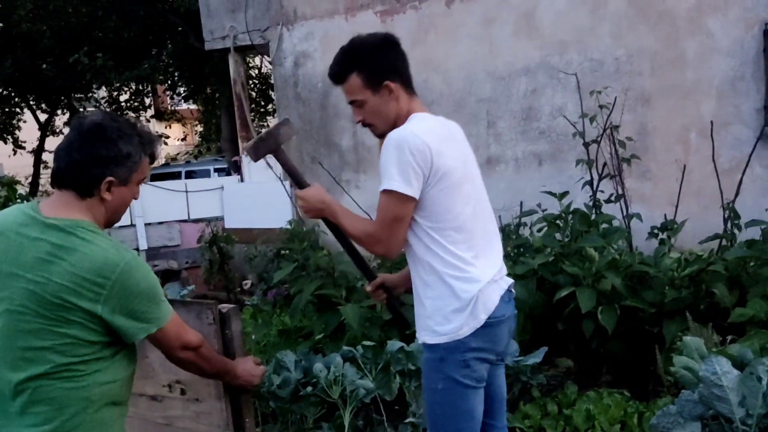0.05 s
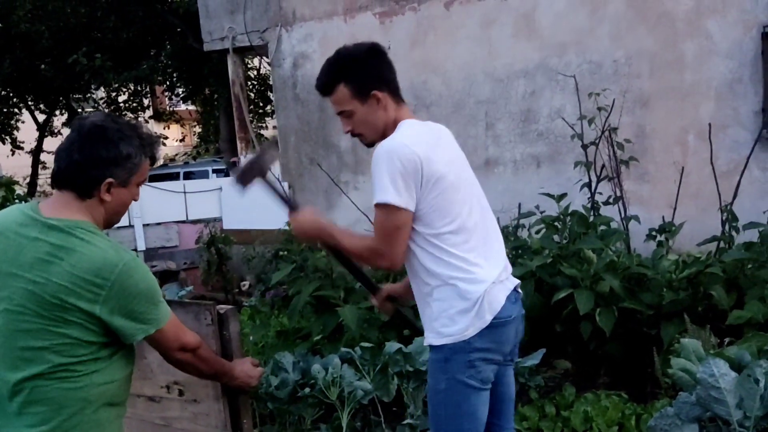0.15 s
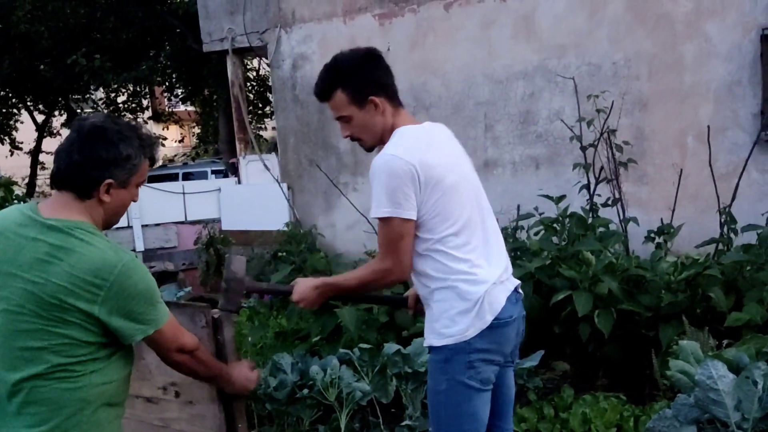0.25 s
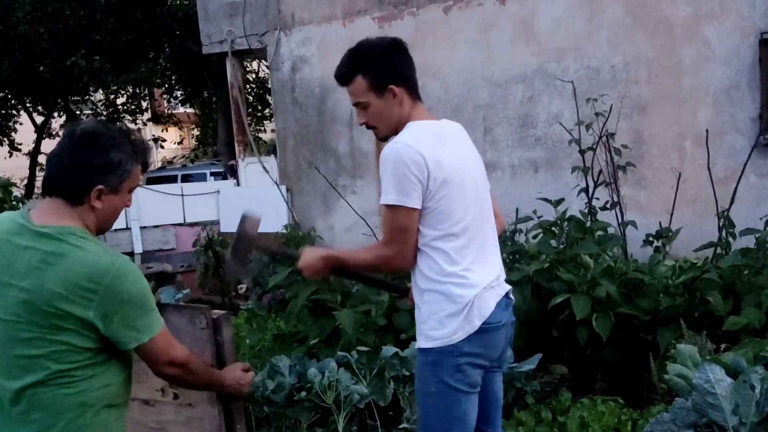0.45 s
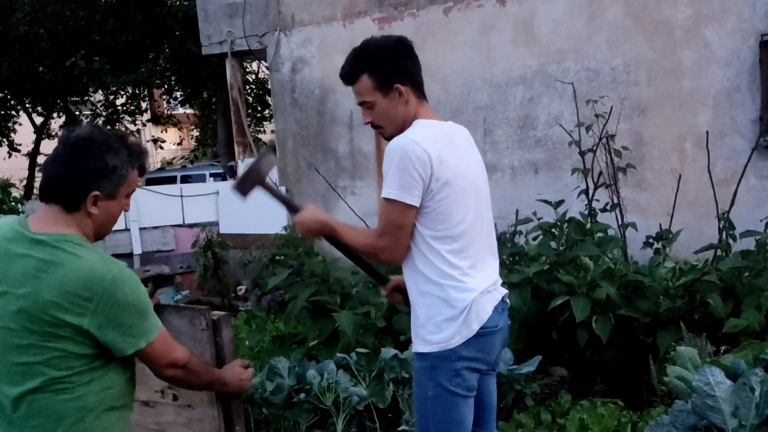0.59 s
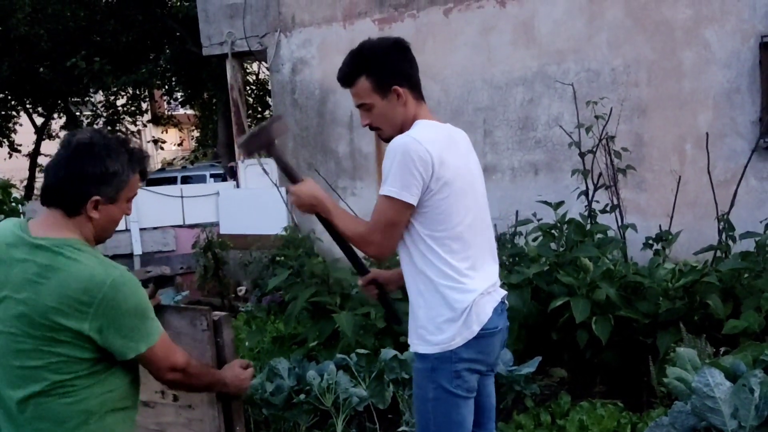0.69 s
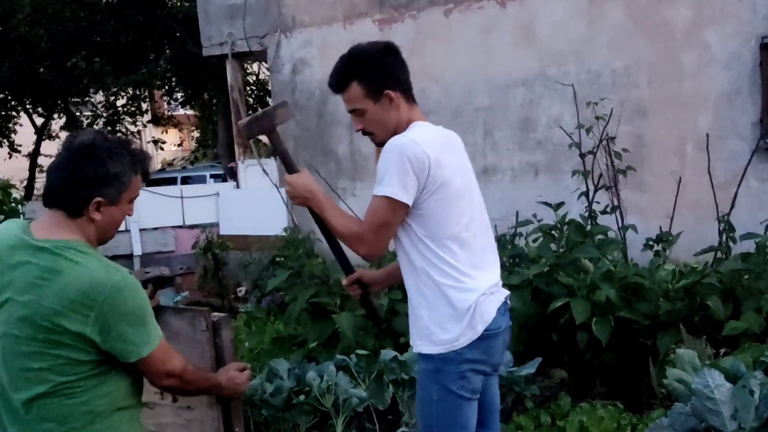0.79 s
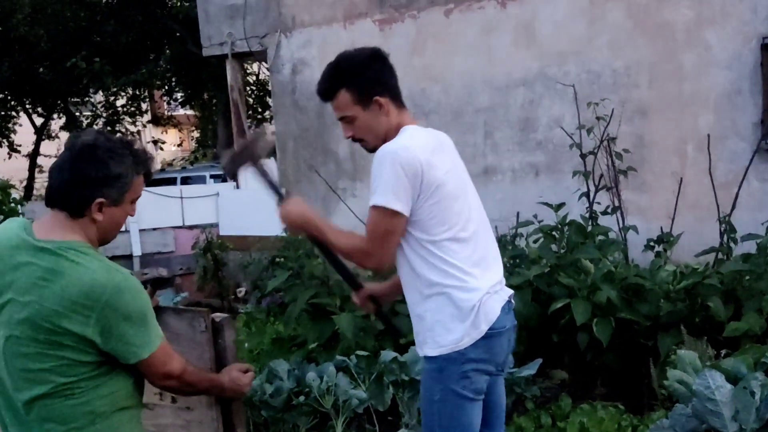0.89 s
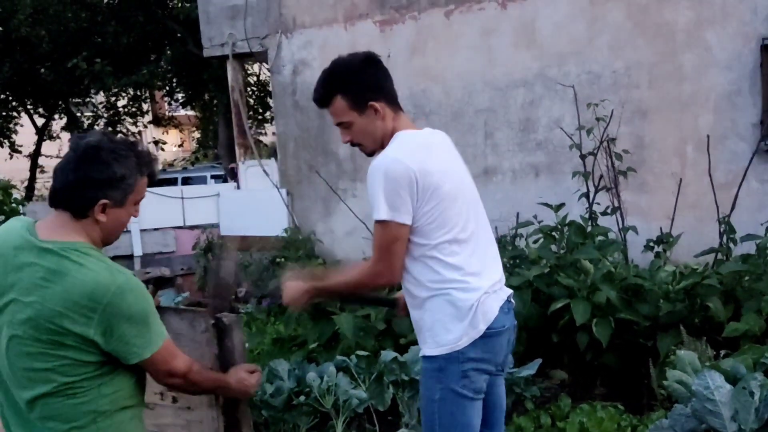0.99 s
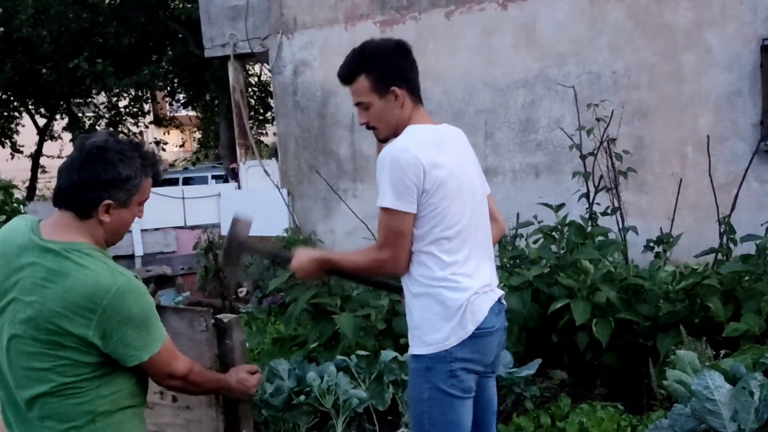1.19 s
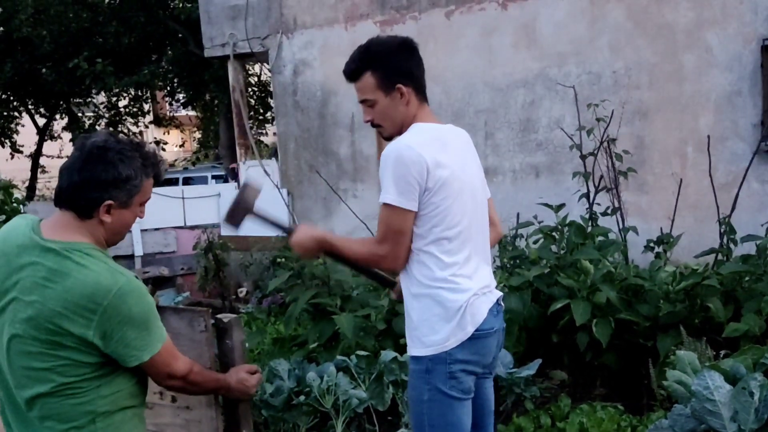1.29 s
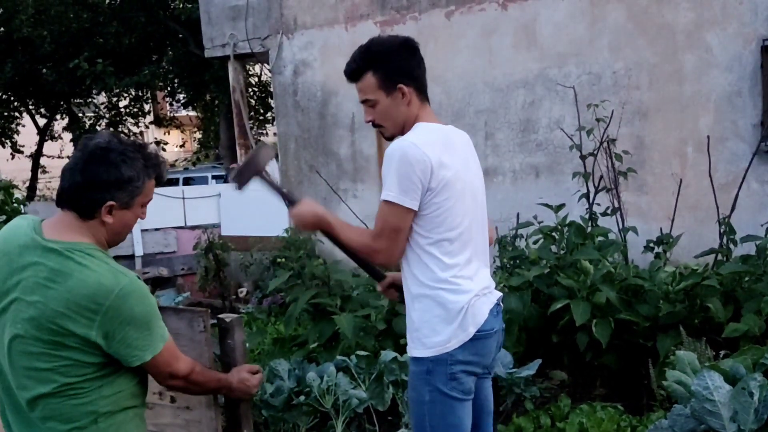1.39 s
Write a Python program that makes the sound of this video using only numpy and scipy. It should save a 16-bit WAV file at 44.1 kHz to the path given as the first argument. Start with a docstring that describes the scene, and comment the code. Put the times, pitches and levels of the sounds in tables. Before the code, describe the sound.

A sledgehammer strikes a wooden post twice, about three quarters of a second apart, each a sharp steel crack and deep woody knock; the first bounces lightly. Quiet garden, faint insect, close stereo recorder.

```python
"""In a garden, a sledgehammer lands twice on top of a wooden post, a few metres from a small stereo recorder.
Steel cracks first, as noise and ringing sines; the wood knocks from high to low, as late modes and falling tones.
The post shudders in the soil as low pushes, and walls return a wash of noise that dies band by band.
The head bounces after the first blow. An insect throbs in ringing pulses over a quiet floor of noise."""
import sys
import numpy as np
from scipy import signal
from scipy.fft import rfft, irfft
from scipy.io import wavfile
from scipy.ndimage import uniform_filter1d

SR = 44100
rng = np.random.default_rng(int(sys.argv[2]) if len(sys.argv) > 2 else 0)


def transcribe(signal):
    """Save signal, clipped to [-1, 1], as a 16-bit WAV file at the path in sys.argv[1]."""
    frames = np.atleast_2d(signal).T
    limited = np.clip(frames, -1, 1)
    pcm = np.round(limited * 32767).astype(np.int16)
    wavfile.write(sys.argv[1], SR, pcm)


N = 63945
T = np.arange(N) / SR
HZ = np.arange(N // 2 + 1) * SR / N


def undb(db):
    """Decibels to amplitude."""
    return 10 ** (np.asarray(db) / 20)


def unit(x):
    """Scale to an RMS of 1."""
    return x / np.sqrt(np.mean(x ** 2))


def at_hz(table, hz):
    """Read a table along a logarithmic pitch axis."""
    pitches, values = np.array(table).T
    return np.interp(np.log(hz + 1), np.log(pitches + 1), values)


def at_s(table):
    """Read a table along time."""
    return np.interp(T, *np.array(table).T)


def sine(pitch_hz, clock=T):
    """Steady tone from a random phase."""
    return np.sin(2 * np.pi * (pitch_hz * clock + rng.random()))


def decay(start_s, rise_s, t60_s):
    """Smooth rise times an exponential fall of 60 dB per t60_s."""
    t = np.maximum(T - start_s, 0)
    return (1 - np.exp(-t / rise_s)) ** 2 * 1000. ** (-t / t60_s)


def bump(centre_s, length_s):
    """Bell-shaped swell in level."""
    return np.exp(-((T - centre_s) / length_s) ** 2)


def walk(rate_hz):
    """Random drift with an RMS of 1, smoothed twice over one period of the rate."""
    samples = int(SR / rate_hz)
    once = uniform_filter1d(rng.standard_normal(N), samples)
    return unit(uniform_filter1d(once, samples))


def stereo_noise(table, alike_hz):
    """Spectrum of coloured stereo noise: left and right are alike well below alike_hz and drift apart above."""
    mid, side = rfft(rng.standard_normal((2, N)))
    alike = 1 / (1 + (HZ / alike_hz) ** 2)
    both = np.sqrt(1 + alike) * mid + np.sqrt(1 - alike) * side * np.array([[1], [-1]])
    inside = (HZ > table[0][0]) * (HZ < table[-1][0])
    gain = undb(at_hz(table, HZ)) * inside
    return both * gain / np.sqrt(2 * np.mean(gain ** 2))


# colour of the garden air: pitch_hz [Hz], level_db [dB per Hz, relative]
GARDEN_COLOUR = [(12, -12.5), (20, 0), (49, -11.5), (86, -6.5), (113, -13), (197, -14.5), (237, -13),
                 (343, -14.5), (686, -20), (1400, -20), (5000, -38.5), (6500, -46.5), (11000, -120)]
# level of the air before its flutter: time_s [s], level_db [dB]
AIR_LEVEL = [(0., -56), (.06, -53), (.2, -53.5), (.55, -58.5), (.68, -55.5), (.8, -57.5), (.93, -52.5),
             (1.22, -54.5), (1.35, -57), (1.45, -55.5)]
# distant low rumbles: centre_s [s], level_db [dB], pitch_hz [Hz], length_s [s]
RUMBLES = [(.855, -54.5, 82, .05), (1.252, -57.5, 70, 0.063), (1.431, -58, 86.1, 0.067)]
# colour of the soft rustle: pitch_hz [Hz], level_db [dB per Hz, relative]
RUSTLE_COLOUR = [(400, -24), (650, 1.5), (850, -3), (1500, -18), (3000, -11)]
# colour of the far insects: pitch_hz [Hz], level_db [dB per Hz, relative]
CHORUS_COLOUR = [(2350, -53), (4000, -44.5), (4470, -35.5), (5020, -30), (6040, -9.5), (7880, -2.5),
                 (11000, -19), (12000, -41), (16000, -37)]
# level of the far insects before its flutter: time_s [s], level_db [dB]
CHORUS_LEVEL = [(0., -63.5), (.12, -72), (.2, -79), (.4, -60), (.5, -58), (.63, -61), (.79, -62),
                (.86, -66), (.93, -75.5), (.96, -78), (1.1, -62), (1.3, -61.5), (1.45, -61)]
GARDEN_ALIKE_HZ = 680
RUSTLE_S, RUSTLE_LENGTH_S, RUSTLE_DB = 1.32, 0.062, -57.5
GARDEN_PAN_DB = 0.5  # left minus right


def garden():
    """Fluttering noise for air and a soft rustle, sine swells for rumble, and a far haze of insects."""
    air = irfft(stereo_noise(GARDEN_COLOUR, GARDEN_ALIKE_HZ), N)
    air *= undb(at_s(AIR_LEVEL) + 3.2 * walk(9.9))
    for centre_s, level_db, pitch_hz, length_s in RUMBLES:
        air += undb(level_db) * bump(centre_s, length_s) * sine(pitch_hz)
    rustle = irfft(stereo_noise(RUSTLE_COLOUR, GARDEN_ALIKE_HZ), N)
    air += rustle * bump(RUSTLE_S, RUSTLE_LENGTH_S) * undb(RUSTLE_DB + 3.2 * walk(59))
    haze = irfft(stereo_noise(CHORUS_COLOUR, 3000), N)
    haze *= undb(at_s(CHORUS_LEVEL) + 0.74 * walk(24))
    pan = undb(GARDEN_PAN_DB * np.array([[.5], [-.5]]))
    return air * pan + haze


# resonances of the near insect: pitch_hz [Hz], spread_hz [Hz], level_db [dB, relative]
INSECT_RESONANCES = [(7687, 25, 0.5), (7310, 30, -8), (8360, 90, -5), (6650, 170, -15.5), (9300, 200, -15),
                     (10700, 300, -17)]
# level of the insect's song: time_s [s], level_db [dB]
INSECT_LEVEL = [(0., -60), (.11, -70), (.2, -80.5), (.36, -56.5), (.47, -54), (.49, -59.5), (.53, -50.5),
                (.575, -53), (.62, -55.5), (.71, -57.5), (.79, -61), (.84, -65.5), (.93, -85.5),
                (1.05, -58), (1.2, -62), (1.34, -59.5), (1.45, -63)]
PULSE_RATE_HZ, FIRST_PULSE_S, PULSE_WIDTH_S = 59.7, .0062, 0.002  # width: standard deviation
WEAK_DB, SCATTER_DB = -6.5, 2.46  # every second pulse is weaker; pulses scatter in level


def insect():
    """Short pulses, strong and weak in turn, sound a few high resonances that shift from pulse to pulse."""
    cycle = (T - FIRST_PULSE_S) * PULSE_RATE_HZ + .5
    pulse = np.floor(cycle).astype(int)
    # one set of random draws, held through each pulse
    chance = rng.standard_normal((N // 400, 2 * len(INSECT_RESONANCES) + 1))[pulse].T
    size = undb(SCATTER_DB * chance[-1] + WEAK_DB * (pulse % 2))
    from_centre_s = (cycle - pulse - .5) / PULSE_RATE_HZ
    gate = size * np.exp(-(from_centre_s / PULSE_WIDTH_S) ** 2 / 2)
    body = np.zeros(N)
    for j, (pitch_hz, spread_hz, level_db) in enumerate(INSECT_RESONANCES):
        gain = undb(level_db + 1.3 * chance[2 * j])
        shifted_hz = pitch_hz + spread_hz * chance[2 * j + 1]
        body += gain * np.sin(2 * np.pi * shifted_hz * T)
    rasp = 1 + .3 * walk(900)
    song = unit(gate * rasp * body) * undb(at_s(INSECT_LEVEL))
    return np.array([song, np.roll(song, 28)])  # the right side lags by 28 samples


# wash after the two full blows: start_s [s], level_db [dB at 500 Hz], decay_factor [ratio],
# tilt_db [dB per octave], late_db [dB at 500 Hz, relative], late_tilt_db [dB per octave], late_length_s [s]
WASHES = [(0.232, -17.5, 1.15, 1, -29, 1.53, 0.197), (0.964, -16, 0.71, 2.62, -27.5, 0.5, 0.18)]
# colour of the wash before its tilt: pitch_hz [Hz], level_db [dB per Hz, relative]
WASH_COLOUR = [(18, -38.5), (30, -6.5), (319, -1), (486, -13.5), (760, -5.5), (1130, -19.5), (1460, -14),
               (3770, -31), (8520, -33), (10500, -49), (14000, -70), (16000, -103)]
# fall of the wash before decay_factor: pitch_hz [Hz], t60_s [s]
WASH_T60 = [(30, 0.72), (100, 0.36), (170, .5), (300, 0.26), (700, 0.25), (2000, 0.22), (3500, 0.15),
            (5000, 0.13), (7500, 0.22), (12000, 0.18)]
WASH_ALIKE_HZ, WASH_RISE_CYCLES = 2500, 2.9
LATE_T60_S, LATE_END_S = 2.2, 0.67  # LATE_END_S: extra t60 once the late echo's length is over
DRY_AFTER_S, DRY_T60_S, DRY_ABOVE_HZ = 0.057, 0.34, 1300  # the treble dries faster after a while


def wash():
    """Post and soil scatter each blow into noise that dies band by band; walls hold a faint echo."""
    out = np.zeros((2, N))
    for start_s, level_db, decay_factor, tilt_db, late_db, late_tilt_db, late_length_s in WASHES:
        noise = stereo_noise(WASH_COLOUR, WASH_ALIKE_HZ)
        late_end = 1000. ** (-np.maximum(T - start_s - late_length_s, 0) / LATE_END_S)
        late = decay(start_s, .03, LATE_T60_S) * late_end
        drying = 1000. ** (-np.maximum(T - start_s - DRY_AFTER_S, 0) / DRY_T60_S)
        for band_hz in 30 * 2 ** np.arange(0, 9.1, .5):
            # overlapping triangles, half an octave apart
            window = np.clip(1 - 2 * abs(np.log2((HZ + 1) / band_hz)), 0, 1)
            band = irfft(noise * window, N)
            octaves = np.log2(band_hz / 500)
            rise_s = WASH_RISE_CYCLES / band_hz + .0012
            fall = decay(start_s, rise_s, decay_factor * at_hz(WASH_T60, band_hz))
            fall *= drying ** (band_hz / (band_hz + DRY_ABOVE_HZ))
            fall += undb(late_db + late_tilt_db * octaves) * late
            out += undb(level_db + tilt_db * octaves + 3.4 * walk(45)) * band * fall
    return out


# the post knocks against the soil: start_s [s], level_db [dB], push_s [s]
SHUDDERS = [(.2485, -11.5, 0.0019), (0.2592, -21.5, 0.0051), (0.264, -11.5, 0.00089),
            (0.985, -32.5, 0.0006), (.9865, -13, 0.0019)]


def shudders():
    """Each knock against the soil is one short inward push with shallow swings on both sides."""
    out = np.zeros(N)
    for start_s, level_db, push_s in SHUDDERS:
        u = (T - start_s - push_s / 2) / (push_s / 4)
        out -= undb(level_db) * (1 - 0.24 * u ** 2) * np.exp(-u ** 2 / 2)
    return out


# bending wave down the post:
# start_s [s], level_db [dB], start_hz [Hz], end_hz [Hz], fall_s [s], rise_s [s], t60_s [s]
SWEEPS = [(.2262, -1, 4687, 709, 0.0012, 0.0012, .035), (.3048, -18.5, 3715, 747.4, 0.0015, 0.0012, 0.053),
          (0.336, -30, 2670, 1310, 0.0022, 0.00066, 0.018), (.967, -4, 4594, 282.3, .0038, 0.0029, 0.037)]


def sweeps():
    """A bending wave runs down the post, high pitches first: a tone drops fast from the treble to the knock."""
    out = np.zeros(N)
    for start_s, level_db, start_hz, end_hz, fall_s, rise_s, t60_s in SWEEPS:
        t = np.maximum(T - start_s, 0)
        turns = end_hz * t + (start_hz - end_hz) * fall_s * (1 - np.exp(-t / fall_s))
        tone = np.sin(2 * np.pi * (turns + rng.random()))
        out += undb(level_db) * decay(start_s, rise_s, t60_s) * tone
    return out


# lag of the left microphone port behind the right: pitch_hz [Hz], lag_ms [ms]
PORT_LAG = [(100, .07), (800, .06), (1800, 0.069), (3500, 0.11), (7000, .25), (9000, .4), (14000, .25)]
POST_PAN_DB = -3  # left minus right


def ports(x):
    """The post reaches the left port later and weaker than the right, with a lag that depends on pitch."""
    lag_s = at_hz(PORT_LAG, HZ) / 1000
    half = undb(POST_PAN_DB / 2) * np.exp(-1j * np.pi * HZ * lag_s)
    return irfft(rfft(x) * np.array([half, 1 / half]), N)


# landings of the head, bounces included: start_s [s], wood_db [dB], steel_db [dB], crack_db [dB],
# landing [0 square to 1 off centre], spread_cycles [cycles by which the knock is spread]
BLOWS = [(0.2253, -8, -31.5, -16, 0.17, 2.8), (0.3053, -25, -46.5, -29, 0.2, 1.7),
         (0.335, -30, -54, -38, 0.27, 2.6), (0.4507, -68.5, -48, -34.5, 0.61, 2.5),
         (0.9661, -11.5, -19, -8.5, 0.57, 1.33)]
# modes of the post: pitch_hz [Hz], square_db [dB, relative], off_centre_db [dB, relative], t60_s [s]
WOOD = [(95.74, -16, -23.5, 0.13), (141.45, -19, -17.5, 0.48), (170, -20, -15.5, 0.44),
        (212, -10.5, -26, 0.17), (275, -10, 4.5, 0.056), (347.2, -7, -4, 0.094), (560, -12.5, -23.5, 0.059),
        (619.5, -10, -8.5, 0.13), (734.2, -10.5, 1.5, .05), (780, -2, -10, 0.059), (881.4, -12.5, -4, .05),
        (1106, -0.5, -11.5, 0.032), (1182.5, -8.5, 2.5, 0.037), (1423, -18, 4.5, 0.023),
        (1497.5, 9.5, -33.5, 0.027), (1900, -3, 6, 0.024), (2240, -5, -18, 0.026), (2767, -11, -1.5, 0.033),
        (3164, -16.5, -18, 0.029)]
# modes of the hammer head: pitch_hz [Hz], level_db [dB, relative], t60_s [s]
STEEL = [(4720, -43.5, .04), (5610, -11.5, 0.027), (6300, -11.5, 0.013), (6450, 3, 0.018),
         (7270, -3, 0.037), (8120, 0, 0.024), (8900, 5, 0.05), (9900, -10, 0.026), (12600, -26, 0.025)]
# colour of the crack: pitch_hz [Hz], level_db [dB per Hz, relative]
CRACK_COLOUR = [(1500, -47), (2600, -8.5), (3600, -6), (5000, -13), (8000, -3.5), (8800, -4),
                (10600, -13.5), (15400, -28.5), (16500, -40.5)]
CRACK_RISE_S, CRACK_T60_S, STEEL_RISE_S = 0.00082, 0.02, 0.00038
CONTACT_S = 0.0016  # the wood answers this long after the crack
WOBBLE = .025  # the shaken post's modes below 400 Hz waver in pitch by this share


def blows():
    """Crack and steel sound at once; each wood mode swells some cycles later, so the knock falls in pitch."""
    shaken_clock = np.cumsum(1 + WOBBLE * walk(25)) / SR
    hiss = unit(irfft(stereo_noise(CRACK_COLOUR, 1e5)[0], N))
    out = sweeps() + shudders()
    for start_s, wood_db, steel_db, crack_db, landing, spread_cycles in BLOWS:
        out += undb(crack_db) * hiss * decay(start_s, CRACK_RISE_S, CRACK_T60_S)
        for pitch_hz, level_db, t60_s in STEEL:
            out += undb(steel_db + level_db) * decay(start_s, STEEL_RISE_S, t60_s) * sine(pitch_hz)
        for pitch_hz, square_db, off_centre_db, t60_s in WOOD:
            level_db = wood_db + square_db + landing * (off_centre_db - square_db)
            late_s = min(spread_cycles / pitch_hz, .0095)
            swell = decay(start_s + CONTACT_S + 0.76 * late_s, 0.21 * late_s, t60_s)
            clock = shaken_clock if pitch_hz < 400 else T
            out += undb(level_db) * swell * sine(pitch_hz, clock)
    return ports(out)


def scene():
    """Garden floor, insect, wash and hammer blows together."""
    return garden() + insect() + wash() + blows()


# colour difference of the two ports: pitch_hz [Hz], difference_db [dB, left minus right]
PORT_COLOUR = [(100, 5.2), (900, 4.1), (1800, 6), (3300, -0.5), (5400, -4), (7400, -11), (8300, 7),
               (9200, 12), (12000, -1)]
TOP_HZ = 16500


def record(dry):
    """The two ports colour the sound differently; the recorder cuts the top with a steep low-pass."""
    half_db = at_hz(PORT_COLOUR, HZ) / 2
    wet = irfft(rfft(dry) * undb([half_db, -half_db]), N)
    top_cut = signal.ellip(10, .2, 90, TOP_HZ, fs=SR, output="sos")
    return signal.sosfilt(top_cut, wet)


dry = scene()
out = record(dry)
transcribe(out)
```